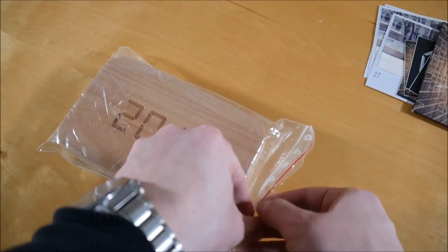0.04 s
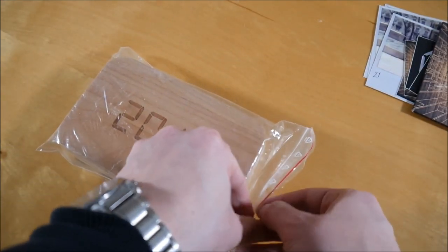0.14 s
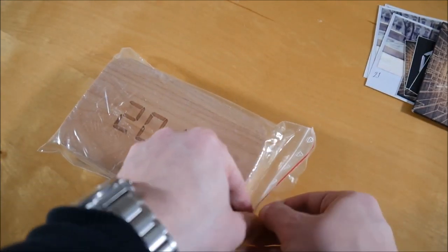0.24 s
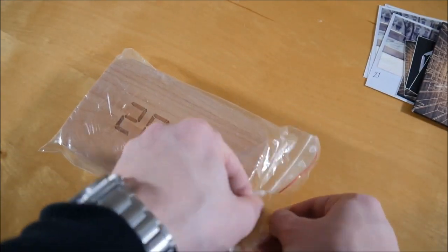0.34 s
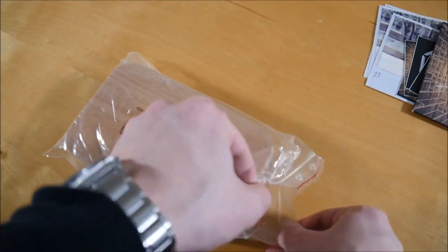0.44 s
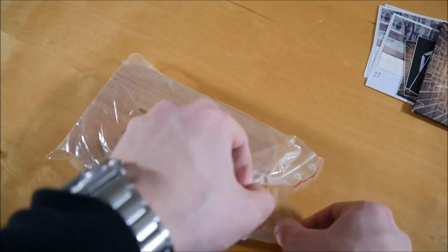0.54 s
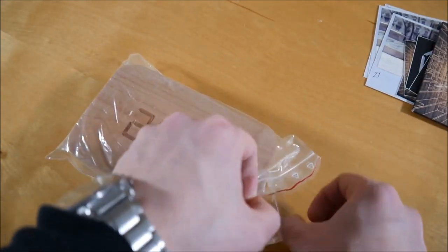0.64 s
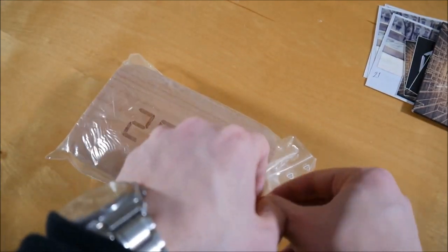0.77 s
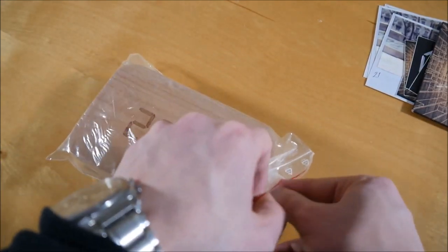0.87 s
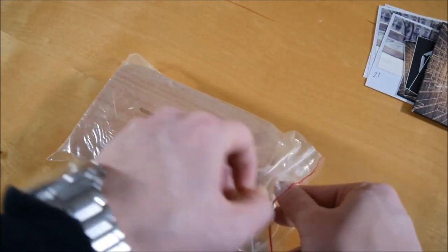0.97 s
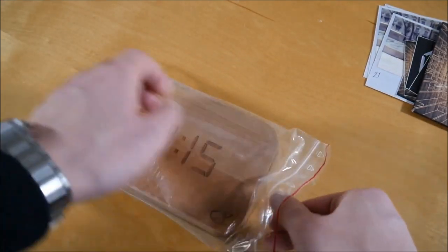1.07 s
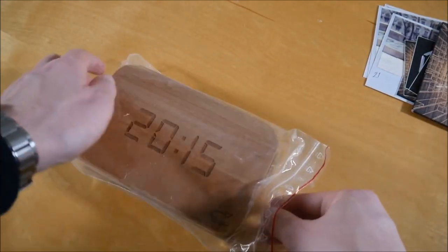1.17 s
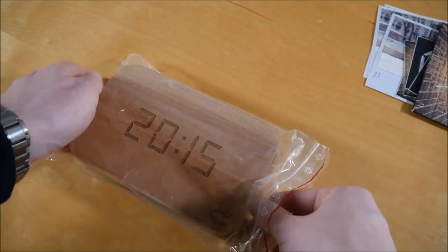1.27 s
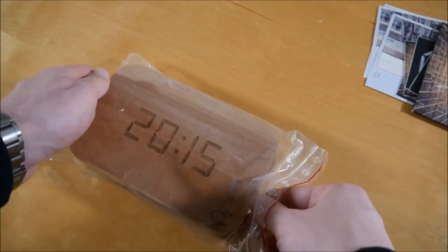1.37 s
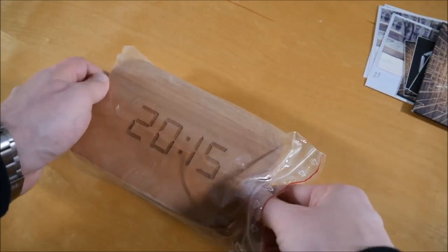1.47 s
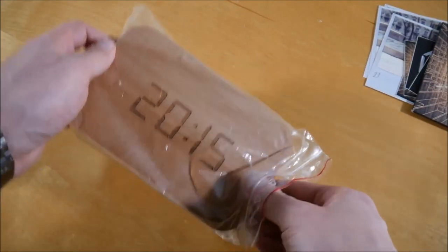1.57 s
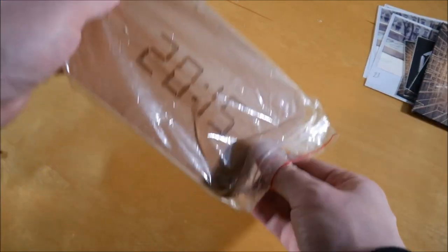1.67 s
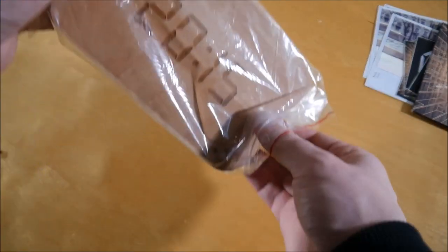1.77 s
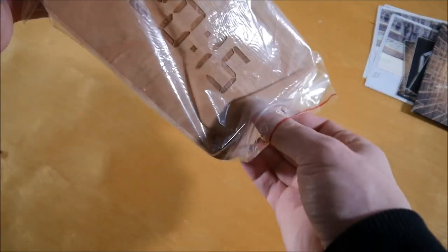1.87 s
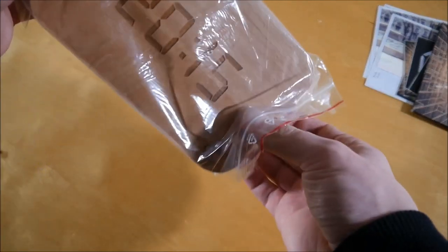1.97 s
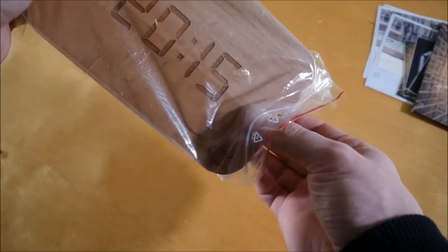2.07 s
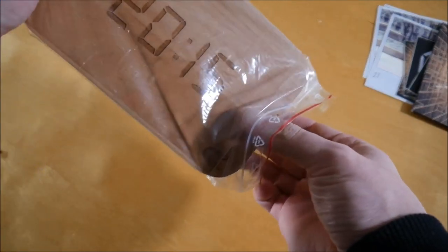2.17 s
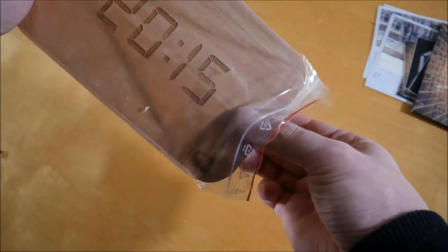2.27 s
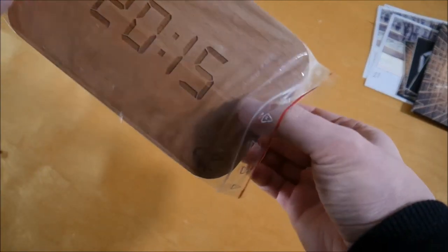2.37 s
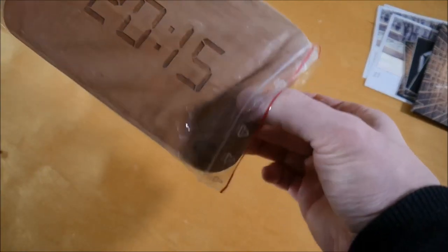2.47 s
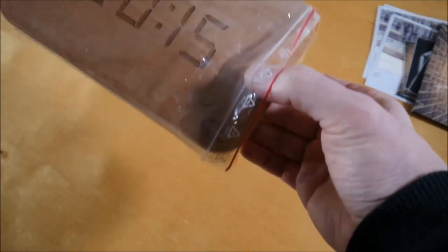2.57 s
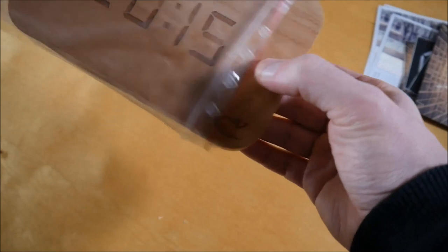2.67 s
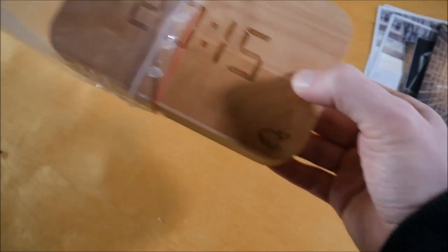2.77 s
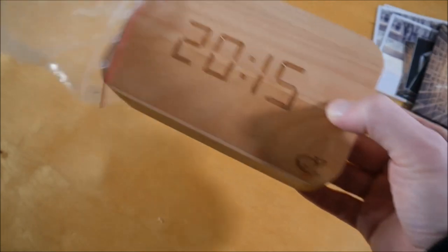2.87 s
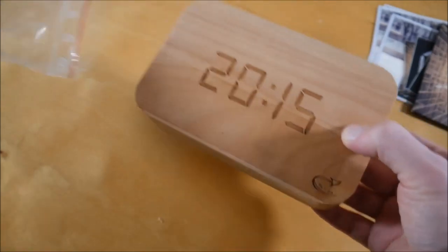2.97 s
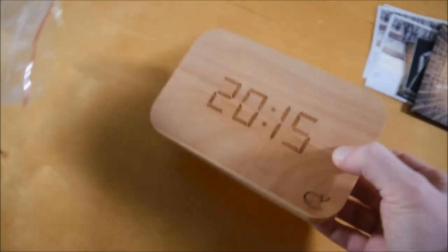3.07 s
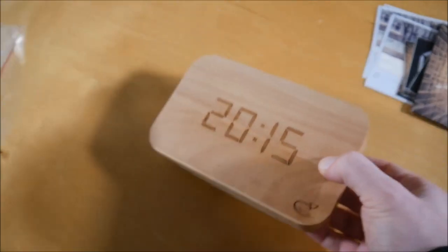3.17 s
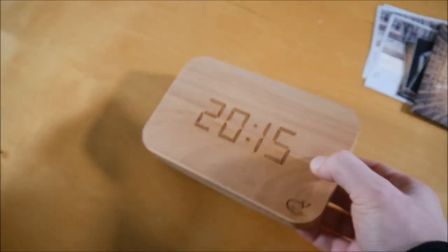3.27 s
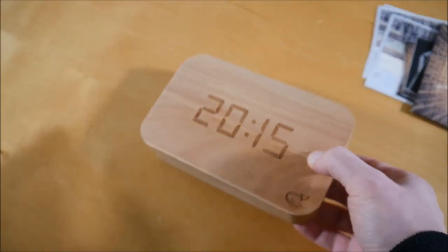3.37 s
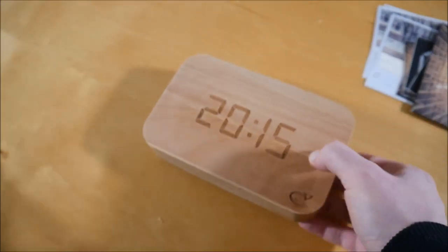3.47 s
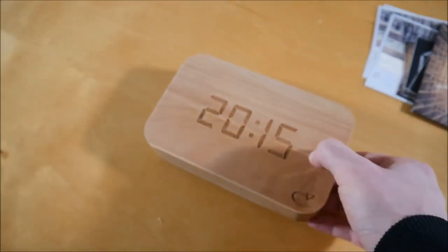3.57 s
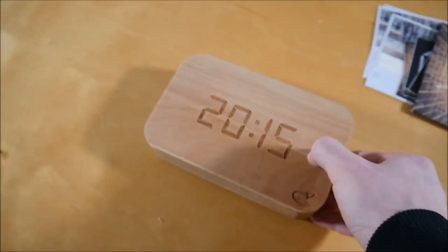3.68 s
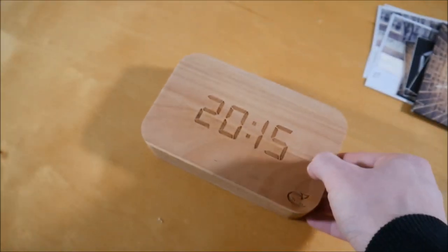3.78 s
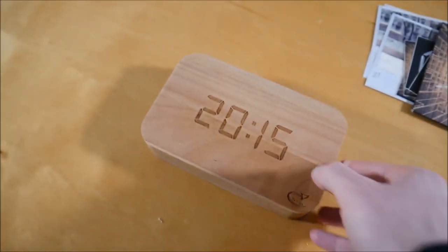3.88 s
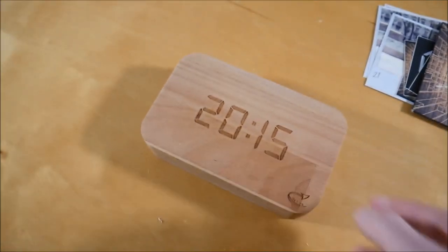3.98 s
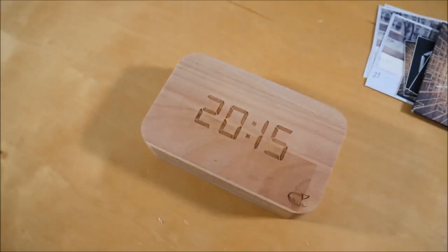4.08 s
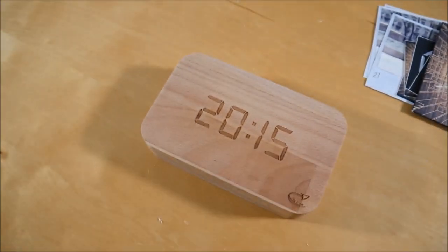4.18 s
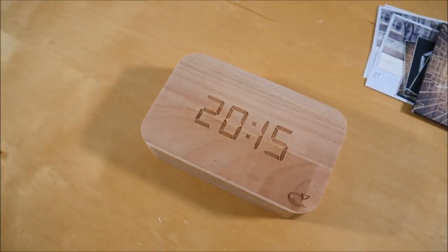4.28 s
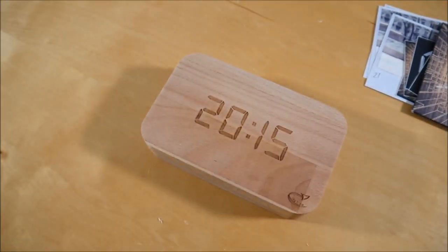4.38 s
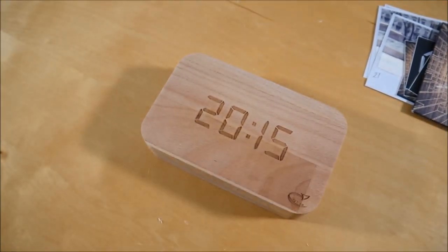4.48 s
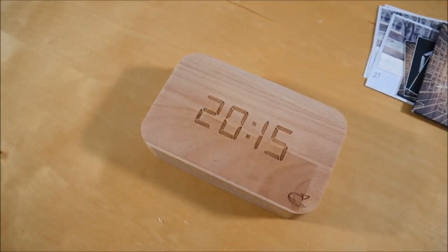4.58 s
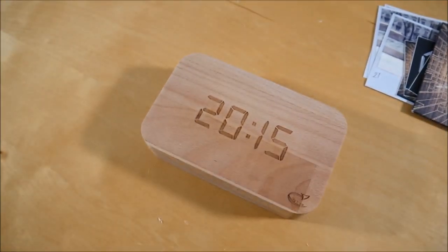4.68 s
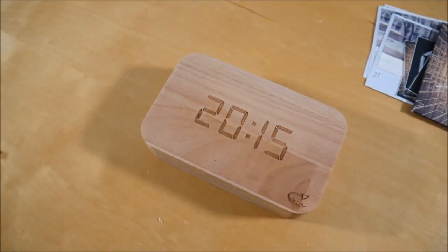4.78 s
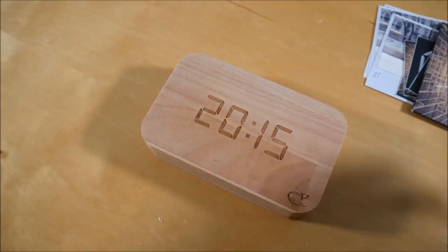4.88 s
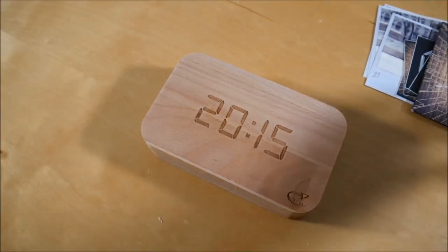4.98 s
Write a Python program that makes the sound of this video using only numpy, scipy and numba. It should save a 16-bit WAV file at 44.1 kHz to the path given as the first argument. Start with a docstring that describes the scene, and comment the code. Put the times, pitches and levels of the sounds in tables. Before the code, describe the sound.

Thin plastic bag crackles and snaps loudly as a small wooden box is worked out, then knocked down and settled on a wooden table.

```python
"""Film buckles in snaps and dense crackle, a small wooden box drums, knocks, rocks and drops flat on a wooden table.
Two hands work a zip bag open and slide the box out, in a quiet room, close under a camera with two microphones.
Film and wood are built from decaying rings and resonated bumps, with dense reflections from the room.
A faint hum and a ticking whirr, both filtered noise, sit in a steady hiss."""
import sys
import numpy as np
from scipy import signal
from scipy.fft import rfft, irfft
from scipy.io import wavfile
from numba import njit

SR = 44100
rng = np.random.default_rng(int(sys.argv[2]) if len(sys.argv) > 2 else 0)


def dump(signal):
    """Clip the signal to [-1, 1] and save it as 16-bit WAV at the path in sys.argv[1]."""
    limited = np.clip(np.atleast_2d(signal).T, -1, 1)
    pcm = np.round(limited * 32767).astype(np.int16)
    wavfile.write(sys.argv[1], SR, pcm)


N = 222264
SIDES = np.array([[1], [-1]])  # left and right microphone


def undb(db):
    """Turn decibels into an amplitude factor."""
    return 10 ** (np.asarray(db) / 20)


def level(x, db):
    """Scale a signal to an RMS level."""
    return x * undb(db) / np.sqrt(np.mean(x ** 2))


def band(x, hz, width):
    """Two-pole resonance, gain 1 at the centre."""
    return signal.lfilter(*signal.iirpeak(min(hz, .45 * SR), hz / width, fs=SR), x)


@njit
def rings(n, start, pole, rise, left, right):
    """Each grain swells quickly and decays, with its own size and phase at either microphone."""
    out = np.zeros((2, n))
    for k in range(len(start)):
        phasor, i, unrisen = 1 + 0j, start[k], 1.
        while i < n and abs(phasor) > .004:
            out[0, i] += (1 - unrisen) * (left[k] * phasor).imag
            out[1, i] += (1 - unrisen) * (right[k] * phasor).imag
            phasor, i, unrisen = phasor * pole[k], i + 1, unrisen * rise[k]
    return out


def grains(s, hz, t60, size, pan_db, lag_s, rise_cycles=.2):
    """Rings from times, pitches and decays; the path difference turns the phase between the microphones."""
    columns = np.broadcast_arrays(s, hz, t60, size + 0j, pan_db, lag_s)
    s, hz, t60, size, pan_db, lag_s = (column.ravel() for column in columns)
    hz = np.clip(hz, 30, .45 * SR)
    pole = np.exp(2j * np.pi * hz / SR - np.log(1000) / (t60 * SR))
    rise = np.exp(-hz / (rise_cycles * SR))
    turn = undb(pan_db / 2) * np.exp(1j * np.pi * hz * lag_s)
    return rings(N, (s * SR).astype(np.int64), pole, rise, size * turn, size / turn)


def spray(s, peak, pan_db, spread_s, tilt_db, parts, fade=0.082):
    """A flurry of very short cracks over all pitches, thinning out and fading after each event."""
    u = rng.random((len(s), parts, 4))
    octave = (np.arange(parts) + u[..., 1]) / parts * 3.5
    phase = np.exp(2j * np.pi * u[..., 2])
    fading = (1 - u[..., 0]) ** fade
    size = peak * undb(tilt_db * octave) * phase * fading / np.sqrt(parts)
    crack_s = s - spread_s * np.log(1 - u[..., 0])
    return grains(crack_s, 1400 * 2 ** octave, .0018, size, pan_db, 3e-5 * (u[..., 3] - .5))


# Background noise colour, before it is set to HISS_DB: pitch_hz, level_db (relative, per Hz)
HISS_COLOUR = [(24, -56), (40, -9.5), (147, -3.5), (215, 5), (269, -1), (433, -6.5), (697, -5),
               (1090, -11.5), (1950, -12.5), (2500, -15.5), (2910, -18), (9940, -21.5), (14800, -24.5),
               (16000, -26.5)]
HISS_DB = -59


def hiss():
    """Steady background noise of a fixed colour, partly different at the two microphones."""
    log_hz = np.log(np.fft.rfftfreq(N, 1 / SR) + 1)
    hz, db = np.transpose(HISS_COLOUR)
    colour = undb(np.interp(log_hz, np.log(hz), db))
    mid, side = irfft(rfft(rng.standard_normal((2, N))) * colour, N)
    return level(mid + .7 * side * SIDES, HISS_DB)


# Hum lines of the camera: pitch_hz, width_hz (of each of two filters), level_db
HUM_LINES = [(146, 8.1, -75.5), (214.5, 13, -62), (267, 12, -79)]


def hum():
    """Noise through narrow resonances gives wavering hum lines, alike at both microphones."""
    lines = 0
    for hz, width, db in HUM_LINES:
        noise = rng.standard_normal(N)
        lines = lines + level(band(band(noise, hz, width), hz, width), db)
    return lines


# Whirr bands of the camera: pitch_hz, width_hz (first filter; the second is twice as wide), level_db
WHIRR_BANDS = [(715, 160, -72.5), (882, 140, -73.5)]
WHIRR_TICKS_PER_S, WHIRR_LEAD_S = 25, 0.028


def whirr():
    """Noise that restarts sharply and dies away at a steady rate rings two resonances."""
    cycle = (np.arange(N) / SR + WHIRR_LEAD_S) * WHIRR_TICKS_PER_S % 1
    beat = np.exp(-cycle / 0.096)
    bands = 0
    for hz, width, db in WHIRR_BANDS:
        ticks = beat * rng.standard_normal(N)
        bands = bands + level(band(band(ticks, hz, width), hz, 2 * width), db)
    return bands


# Tugs of the hands at the bag: start_s, rise_s, hold_s, crackle_db (relative), fold_db (big folds, low mids over
# the crackle), taut_db (taut film, top over the crackle), box_db (drumming, relative), pan_db (left minus right)
HAND_TUGS = [(0.017, 0.015, 0.12, -58.5, 3.5, -2, -67.5, 4),
             (0.181, 0.0018, 0.0041, -41.5, -17, -35.5, -59.5, -2),
             (0.216, 0.021, 0.01, -45, -10, -15, -69, 0), (0.3, .005, 0.052, -55.5, -10.5, -3, -61, 1),
             (0.364, 0.05, 0.11, -29.5, -14.5, -7, -43, -1.5),
             (0.598, 0.0062, 0.15, -46.5, -5.5, -10, -49.5, -2),
             (0.825, 0.021, 0.0062, -42, -3, -5, -52, 1.5), (0.893, 0.2, 0.0024, -37.5, -4, -5, -46, -3),
             (1.124, 0.082, .01, -46, -4, 5, -44.5, -1), (1.32, 0.015, 0.14, -49, -13, -12, -55.5, 5),
             (1.23, 0.094, 0.055, -64, 1, -4, -56, 3), (1.41, 0.026, 0.11, -65, -9, 0, -57, 0),
             (1.478, 0.0052, 0.0058, -37.5, -18, -13, -62.5, 5),
             (1.513, 0.02, 0.19, -38, -6, -5.5, -46.5, 2), (1.749, 0.083, 0.016, -33, -8, 1, -38.5, -1.5),
             (1.919, 0.0094, 0.052, -36.5, -10.5, -3, -46, 0),
             (2.01, 0.0063, 0.096, -33, -8.5, -5.5, -36.5, -2),
             (2.192, 0.013, 0.0056, -53.5, 3, -10.5, -38.5, -1),
             (2.257, 0.025, 0.27, -35, -9, 2.5, -37, 1.5),
             (2.395, 0.097, 0.0084, -29.5, -13, -6.5, -31, -1),
             (2.6, 0.0079, 0.012, -34, -5, -23, -30.5, 5), (2.675, 0.067, 0.19, -30.5, -3.5, 2.5, -30.5, 2),
             (3.062, 0.011, 0.0036, -65, 14.5, -17.5, -67.5, 16.5),
             (3.51, .005, 0.011, -68, -20, -10, -72, -5), (3.62, 0.01, .005, -67.5, 1, 14, -63, -4.5),
             (3.706, 0.11, 0.092, -50.5, 0.5, -10, -45.5, 3), (4.037, 0.068, .01, -65, -13, -3, -60.5, 5.5),
             (4.121, 0.14, 0.0075, -52, -12, -2, -57, 4.5), (4.31, 0.024, 0.05, -52, -9, 0.5, -61, 5),
             (4.461, 0.026, 0.019, -57, -16, -4.5, -87, 6), (4.792, 0.02, 0.0031, -66, -11, -5.5, -75, 6.5),
             (4.994, 0.0062, 0.0093, -41.5, -9.5, -8.5, -61, 3.5)]
SWELL_DB, SAG_DB_PER_S, RELEASE_DB_PER_S = 15.5, 7.5, 273  # gained in the rise, lost while held, lost once let go


def tugging(s):
    """Every tug swells, sags while held and is let go; where tugs overlap the stronger one sets the colour."""
    start, rise, hold, tug_db, tug_fold_db, tug_taut_db, tug_box_db, tug_pan_db = np.transpose(HAND_TUGS)
    shapes = []
    for start_s, rise_s, hold_s in zip(start, rise, hold):
        times = np.cumsum([start_s - .006, .006, rise_s, hold_s, .5])
        sag_db = -SAG_DB_PER_S * hold_s
        shapes.append(np.interp(s, times, [-150, -SWELL_DB, 0, sag_db, sag_db - RELEASE_DB_PER_S / 2]))
    shape_db = np.array(shapes)
    power = undb(2 * (shape_db + tug_db[:, None]))  # doubled decibels turn amplitude into power
    total = power.sum(0)
    fold_db, taut_db, pan_db = (column @ power / total for column in (tug_fold_db, tug_taut_db, tug_pan_db))
    box_db = 10 * np.log10(undb(2 * tug_box_db) @ undb(2 * shape_db))
    return 10 * np.log10(total), fold_db, taut_db, box_db, pan_db


def crackle(count=40000, colour_db=1.64, scatter_db=4.0, burst_db=3, jerk_db=1.5, largest_db=15, thin_db=5,
            lag_s=2.5e-5):
    """Thousands of tiny buckles; big folds ring low, taut film rings high, and they come in short bursts."""
    u, g = rng.random((count, 4)).T, rng.standard_normal((count, 2)).T
    s, octave = u[0] * N / SR, 4.5 * u[1] ** .65 - 2.7
    crackle_db, fold_db, taut_db, _, pan_db = tugging(s)
    low, high = np.clip(-octave / 1.5, 0, 1.2), np.clip(octave / 1.6, 0, 1)
    at = s * SR
    # a burst is one patch of film, so it spans about an octave and a half
    patch = (octave / 1.5 + 2 + u[3]).astype(int)
    bursts = rng.standard_normal((N // 150 + 1, 6))[(at / 150).astype(int), patch]
    # other folds take the strain every few hundredths of a second, each with its own colour
    fold = (octave / .8 + 4 + u[3]).astype(int)
    colours = rng.standard_normal((N // 1200 + 1, 8))[(at / 1200).astype(int), fold]
    # the whole film slips in jerks of a few ms
    jerks = rng.standard_normal(N // 200 + 1)[(at / 200).astype(int)]
    size_db = burst_db * bursts + colour_db * colours + jerk_db * jerks - scatter_db * np.log(1 - u[2])
    size_db = np.minimum(size_db, largest_db)
    db = crackle_db + low * fold_db + high * (taut_db + thin_db) + size_db
    hz = 4200 * 2 ** octave
    size = undb(db) * np.exp(2j * np.pi * u[3])
    return grains(s, hz, 8 / hz, size, pan_db + 1.5 * g[1], lag_s * g[0])


SMALL_POPS_PER_S, SMALL_POP_DB = 120, 5.5  # mean level over the crackle


def small_pops(low_hz=700, octaves=2.8, scatter_db=2, crack_db=1, crack_scatter_db=3, pan_scatter_db=3):
    """Snap rows drawn by chance; their strength follows the tug of the moment."""
    count = int(SMALL_POPS_PER_S * N / SR)
    u, g = rng.random((count, 2)).T, rng.standard_normal((count, 3)).T
    s = u[0] * N / SR
    crackle_db, _, _, _, pan_db = tugging(s)
    ring_db = crackle_db + SMALL_POP_DB + scatter_db * g[0]
    hz = low_hz * 2 ** (octaves * u[1])
    return np.transpose([s, ring_db, hz, crack_db + crack_scatter_db * g[1], pan_db + pan_scatter_db * g[2]])


# Loud single buckles of the film: start_s, ring_db (relative), pitch_hz, crack_db (over the ring),
# pan_db (left minus right)
FILM_SNAPS = [(0.022, -37, 1500, -2, 0.5), (0.0343, -39, 1620, 11, -8), (0.056, -32.5, 1450, 11, -3),
              (0.0895, -26, 1430, 0, -2.5), (0.1371, -24, 1750, -6, -3.5),
              (0.1476, -19.5, 1760, -4.5, -2.5), (0.1882, -23.5, 1390, 0, 1),
              (0.2342, -18.5, 1950, -7.5, -3), (0.2513, -10.5, 1820, -19.5, 2), (0.2872, -15, 1900, 8.5, 2),
              (0.2878, -7.5, 6450, -1, 1), (0.302, -25, 1610, 13.5, 1), (0.3554, -24, 1700, -0.5, -4),
              (0.3733, 3, 1740, -1.5, -3), (0.3738, -15, 4100, -10, -1.5), (0.3902, -8.5, 1480, 13, 2),
              (0.4369, -18.5, 2800, -9, 11), (0.4475, -16, 2140, -8, -2), (0.457, -14, 2800, -6, 3),
              (0.4627, -13, 2920, -11, 3.5), (0.4915, -22.5, 1490, 13, 1), (0.5055, -24, 5060, -5, 0),
              (0.5143, -11.5, 3900, 3, -8), (0.5258, -8.5, 5200, -8, 2), (0.497, -15, 3530, 1, 5),
              (0.532, -21, 3500, 11, -1), (0.6064, -12, 3670, 0.5, 3), (0.611, -15, 2850, 2.5, -4),
              (0.6708, -26.5, 806, -1, 4), (0.6792, -22, 4300, 4, 3), (0.7222, -26, 2200, 9, 1),
              (0.767, -30, 3200, -3, 0), (0.8365, -22, 3600, -4.5, 0.5), (0.8805, -20.5, 2100, -14, -3),
              (0.9207, -25, 2300, -2, -5), (0.987, -23, 1480, 3, 5), (0.9905, -20.5, 6500, 8, -2),
              (0.996, -22, 1490, -5, 0), (1.024, -22, 3200, -3, 0), (1.041, -19.5, 1940, 1.5, 5),
              (1.083, -22, 1480, -7, 0), (1.0895, -8.5, 5500, -6.5, 1), (1.098, -11.5, 3400, -2, 0),
              (1.112, -22.5, 1480, 3, 3), (1.164, -26, 1400, 4, 4), (1.1474, -25.5, 2060, 8.5, -1),
              (1.2051, -31, 1120, 8, -1), (1.21, -21, 5500, -1, 0), (1.218, -23, 5500, 7, 2),
              (1.233, -13, 10600, -7, 0), (1.3004, -36, 2000, -5, -2), (1.314, -35, 1250, -5, 0),
              (1.338, -20.5, 2030, -1, -3), (1.3572, -21, 2630, -5, -3), (1.4006, -28, 4700, 12.5, -1.5),
              (1.4268, -21.5, 3220, 1, -0.5), (1.429, -29.5, 1300, -5, 4), (1.4701, -4.5, 7700, -5.5, -0.5),
              (1.5364, -24, 1400, 10, -8), (1.549, -15.5, 2840, 9, -3), (1.5525, -16, 3360, 12.5, -1),
              (1.5787, -20, 2680, 7, 3), (1.586, -17, 2600, 5, -4), (1.601, -18, 1040, 4.5, 3),
              (1.797, -18, 3270, 5, 5), (1.6234, -18.5, 4600, 10.5, 2), (1.6797, -19, 3450, 8, -2),
              (1.7474, -22, 3720, 6, -0.5), (1.7644, -17.5, 6300, 0, 2), (1.8309, -16.5, 1930, 11, -5),
              (1.8441, -10.5, 2880, 7, -3), (1.849, -14, 3230, 9, 7), (1.931, -20.5, 3500, 7.5, 0),
              (1.936, -4.5, 8100, -7, 3), (1.943, -19, 5500, 4, 0), (1.966, -25, 5700, 11, 7),
              (1.9739, -15.5, 3570, -8, -1), (2.0066, -24, 1820, -4, 3), (2.021, -7, 4500, 6, -2),
              (2.0254, -4.5, 1500, 9, 2), (2.041, -15, 1900, -13, -2), (2.0765, -15.5, 2750, 12, 3),
              (2.088, -20, 2600, 3, -5.5), (2.1051, -15.5, 1184, -11, 4), (2.1259, -17, 1640, 5, 1),
              (2.1675, -31.5, 1680, 16, 4), (2.175, -25, 1900, 3, 0), (2.191, -26, 1900, 1, 0),
              (2.2015, -9, 3840, 4.5, 1), (2.2216, -19, 3630, -1, 0.5), (2.28, -16, 4500, 2, 0),
              (2.264, -22, 5300, 10.5, 2), (2.2736, -23, 3640, 5, -7), (2.287, -18, 3500, -1, 3),
              (2.3042, -20, 1810, -1, -5), (2.358, -17, 1900, 7, -3.5), (2.389, -15, 3930, 9, 4),
              (2.4072, -1, 9250, -2.5, 2), (2.376, -10, 9050, 2, 0), (2.449, -9, 9500, 3, 0),
              (2.424, -12.5, 1970, 6, -4), (2.4327, -12, 1930, 3, 1), (2.5476, -28, 1400, 7, 3),
              (2.5631, -28, 1550, 19.5, 3), (2.603, -21, 3950, 12, 2), (2.6085, -21.5, 1430, 13, 0),
              (2.637, -11.5, 2160, -11, 4), (2.641, -6.5, 6100, -4, 2), (2.654, -15, 4970, -2, 0),
              (2.685, -35, 1500, -6, 0), (2.7085, -17, 1800, 4, -1), (2.7408, -17, 1320, -2, 7),
              (2.7771, -31, 1350, -8.5, 16.5), (2.969, -16.5, 3500, 1.5, -1.5),
              (2.9607, -15, 2840, 4.5, -0.5), (2.9883, -9.5, 7000, 2, 4), (3.0688, -28.5, 3060, -16, 3),
              (3.0808, -15, 3340, -7, 3.5), (3.4241, -38, 3900, -29, 9), (3.5404, -25, 5670, 11.5, 5.5),
              (3.6182, -43.5, 2530, 20, 8.5), (4.0731, -35, 5740, 2.5, 5), (4.4777, -31, 6010, 3, 4),
              (4.9067, -34.5, 7420, -11.5, 4), (4.9977, -33.5, 4760, -14, 0.5)]


def snaps(cycles=8.2, after_db=-9, mean_tilt_db=-0.45, tilt_scatter_db=0.91, echo_s=0.0041, echo_db=-10):
    """A fold pops: a few cycles at its own pitch, sharp cracks, a settling flurry and a bounce off a surface."""
    rows = np.vstack([FILM_SNAPS, small_pops()])
    s, db, hz, crack_db, pan_db = (column[:, None] for column in rows.T)
    crack = undb(db + crack_db)
    # some folds crack dull, some bright: decibels per octave
    tilt_db = mean_tilt_db + tilt_scatter_db * rng.standard_normal(s.shape)
    pop = grains(s, hz, cycles / hz, undb(db), pan_db, 0)
    pop = pop + spray(s, crack, pan_db, .001, tilt_db, parts=30)
    settle = spray(s, crack * undb(after_db), pan_db, .007, tilt_db, parts=90)
    bounce = undb(echo_db) * np.roll(band(pop, 8300, 8600), int(echo_s * SR), axis=1)
    return pop + settle + bounce


MODE_PAN_DB, MODE_LAG_S = 3.5, 6e-5  # scale of each mode's random lean and lag between the microphones
ONE_SIDED_HZ = 680  # modes under this radiate ever more evenly


def sidedness_db(hz):
    """How far a mode may lean to one microphone; long waves reach both alike."""
    return MODE_PAN_DB * np.minimum(hz / ONE_SIDED_HZ, 1)


# Modes of the wooden box and table top, drummed here and struck in knocks():
# pitch_hz, level_db (relative), t60_s (undamped)
WOOD_MODES = [(91, -12, 0.15), (152.6, -16, 0.24), (203.4, -14.5, 0.23), (248, -13, 0.088),
              (288.8, -5.5, 0.099), (341.6, -3, 0.085), (386, -9, 0.084), (413, -9, 0.051),
              (459.6, -6.5, 0.065), (520, -2, 0.051), (591, -3.5, 0.051), (640.3, -5.5, 0.04),
              (700, -7, 0.083), (778.5, -8, 0.08), (883, -12, 0.074), (1022, -9.5, 0.02),
              (1285, -4.5, 0.012), (1451, -10, 0.042), (2160, -4, 0.014)]
TABLE_HZ, DEEP_HZ = 230, 400  # table modes lie under the first, deep box modes between the two
LIFTED_S, LANDED_S = 1.65, 3.24
TABLE_LIFTED_DB, TABLE_RESTING_DB = -23, -3  # gain; the table is nearly still while the box is lifted
DEEP_LIFTED_DB, DEEP_RESTING_DB = -6.5, -1.5  # gain of the deep box modes
ROCKING_START_S, ROCKING_END_S = 3.47, 3.785  # the box wobbles on one edge
ROCKING_DB, ROCKING_DB_PER_S = -38.5, 39  # level at the start, then the loss
ROCKING_HIGH_DB = -18  # all the other modes, over the wobble
ROCKING_HZ, ROCKING_WIDTH_HZ = 282, 15  # held by one edge, the box rings mostly in one low mode


def drumming(rate=550, damping=0.33):
    """Fingers and film rub box and table with many small bumps (rate per second) that ring their modes."""
    bumps = (rng.random(N) < rate / SR) * rng.standard_normal(N)
    hz = np.transpose(WOOD_MODES)[0]
    modes = []
    for mode_hz, db, t60 in WOOD_MODES:
        ring = band(bumps, mode_hz, 2.2 / (damping * t60))  # a shorter decay is a wider resonance
        modes.append(level(band(ring, mode_hz, 0.53 * mode_hz), db))
    lean_db = sidedness_db(hz)[:, None, None] * rng.standard_normal((len(hz), 1, 1)) * SIDES
    modes = np.array(modes)[:, None] * undb(lean_db)
    deep = level(modes[(hz >= TABLE_HZ) & (hz < DEEP_HZ)].sum(0), 0)
    high = level(modes[hz >= DEEP_HZ].sum(0), 0)
    table = level(modes[hz < TABLE_HZ].sum(0), 0)
    wobble = level(band(band(bumps, ROCKING_HZ, ROCKING_WIDTH_HZ), ROCKING_HZ, ROCKING_HZ / 2), 0)

    t = np.arange(N) / SR
    steps = t[::64]
    grip = undb(np.interp(t, steps, tugging(steps)[3]))
    lifted = (t > LIFTED_S) & (t < LANDED_S)
    table_gain = undb(np.where(lifted, TABLE_LIFTED_DB, TABLE_RESTING_DB))
    deep_gain = undb(np.where(lifted, DEEP_LIFTED_DB, DEEP_RESTING_DB))
    gripped = grip * (high + deep_gain * deep + table_gain * table)
    rocking = undb(ROCKING_DB - ROCKING_DB_PER_S * (t - ROCKING_START_S))
    rocking = rocking * (t > ROCKING_START_S) * (t < ROCKING_END_S)
    return gripped + rocking * (wobble + undb(ROCKING_HIGH_DB) * (high + deep + table))


def softness(hz, contact_ms):
    """A push passes little above the pitch whose period is the contact time."""
    return 1 / (1 + (hz * contact_ms / 1000) ** 3)


# Box against table or fingers: start_s, blow_db (relative), contact_ms, then relative to the blow: click_db (edge),
# tick_db (bright), table_db (table top), deep_db (deep box modes), thud_db (air); spot_hz (favoured pitch)
BOX_KNOCKS = [(1.185,-35,0.96,-26,-30,-5,-9,-12,710),(1.281,-45,2,-22,-25,-10,6,-12,370),(1.348,-34.5,1,-12,-22,6,8,-14,520),(1.356,-27,1.8,-20,-25,9,1,-12,331),(1.372,-32.5,2,-20,-25,7,2,-12,292),
              (1.428,-31.5,3,-19,-20,8,3,-12,149),(1.451,-43,2.6,-20,-25,2,5,-10,203),(1.523,-36.5,2.7,-16,-22,-4,6.5,-12,354),(1.601,-41,2.5,-20,-25,-16,6,-10,340),
              (2.489,-28,0.79,-14,-15,-14,1,-10,384),(2.499,-22,0.68,-12,-12,2,4,-10,384),(2.511,-20,1.3,-3,-24,-15,1,-3,640),(2.545,-30,1.5,-15,-24,-17,5,-14,385),
              (2.6092,-15,1,-10,-17,-25,-2,-16,525),(2.621,-23.5,0.97,-16,-22,-9,-6,-7,523),
              (2.64,-14,1.6,-9,-22,-29,1,-8,369),(2.71,-18.5,1.1,-18,-14,-14,1.5,-18,290),(2.735,-21,.8,-12,-15,-23,-8,-6,636),(2.742,-16,0.56,-17,-15,-24.5,-12,-15.5,650),(2.752,-22.5,0.89,-12,-18,7.5,-6,-10.5,222),(2.866,-19.5,.6,-14,-20,-22,-4,-10,630),
              (2.885,-23,.7,-13,-20,-22,-8,-8,640),(2.911,-26,1,-14,-19.5,-25,-6,-10,450),
              (3.2427,-8,0.34,9,16.5,-10,0,-8,329),(3.253,-9,1.1,-23,-17,3,-5,-16.5,526),(3.263,-18.5,1,-21.5,-14.5,-4,-9,-10,580),(3.274,-19,0.82,-8.5,-16.5,-7.5,0,-7,290),(3.2848,-11.5,0.51,6.5,6.5,-5,-8,-6,340),(3.299,-13,1.1,-20,-2,0.5,2.5,-10,320),
              (3.31,-16.5,.9,-9,-11,1,-8,-8,570),(3.332,-19.5,0.78,-20,-20,5,-1.5,-15,190),
              (3.449,-12.5,0.48,-0.5,-5.5,0,0,-2,341),(3.457,-20,1,-4,-12,-18,3,-20,317),(3.4661,-18.5,1.1,5,-1,-8,-10,-14,500),(3.472,-19.5,0.62,-2.5,-14,-16,-3,-14,332),
              (3.497,-21.5,2,-17,-29,-15,4,-16,287),(3.519,-19,2.2,-16,-15,-2,5,-20,336),(3.553,-22.5,3.3,-28,-32,-10,5.5,-15,290),
              (3.584,-23,1.5,-10,-29,-12,3,-23,294),(3.602,-30,2,-18,-20,-14,1,-15,282),(3.633,-28.5,1.4,-9,-28,-4,5,-16,327),(3.649,-40,1.6,-15,-30,-12,-2,-14,280),
              (3.669,-25,2.3,-15,-30,-7,-2,-14,281),(3.682,-39,1.3,-12,-30,-5,-11,-10,280),(3.796,-20,1.7,-32,-20,-17,1,-22,340),
              (3.821,-15,0.49,6.5,3,-26,2.5,-9,343),(3.8273,-7.5,0.14,4,10,7,2,-12,330),(3.832,-10.5,0.28,3,5,0,-5,-12,645),(3.842,-9.5,0.27,-13,0.5,-19,-5,-4,532),(3.854,-12.5,0.61,-8,-10,-15,3,5.5,650),(3.864,-15,0.81,-15,-3,-1,-5,-3,467),
              (3.885,-18,0.4,1.5,2.5,-5,-5,-6,1440),(3.905,-23,0.89,-6,-7,2,-19,-10,206),
              (4.624,-50,.62,6,-17,2,-4.5,-12.5,220),(4.997,-37.5,0.96,-3,-16,-24,-14,-10,510)]
SPOT_DB, SPOT_WIDTH = 8.5, 0.09  # the struck spot favours modes near one pitch; width in log pitch


def knocks(ring_db=-8, spread_db=2.0, detune=0.012, pull=0.79, click_hz=1350, click_t60=0.0069, thud_hz=480,
           crack_db=11, rattle_db=7.5, phase_scatter=0.65, swell=0.4):
    """Every blow rings the same wood; a longer, softer contact leaves the high modes quiet."""
    columns = (column[:, None] for column in np.transpose(BOX_KNOCKS))
    s, db, contact_ms, click_db, tick_db, table_db, deep_db, thud_db, spot_hz = columns
    hz, mode_db, t60 = np.transpose(WOOD_MODES)
    g = rng.standard_normal((len(s), len(hz), 5))
    near = np.exp(-(np.log(hz / spot_hz) / SPOT_WIDTH) ** 2)
    held_hz = hz * (spot_hz / hz) ** (pull * near)  # grip and contact bend the modes a little
    part_db = np.where(hz < TABLE_HZ, table_db, deep_db * (hz < DEEP_HZ))
    size_db = db + mode_db + SPOT_DB * near + ring_db + spread_db * g[..., 0] + part_db
    size = undb(size_db) * np.exp(1j * phase_scatter * g[..., 2]) * softness(hz, contact_ms)
    body = grains(s, held_hz * (1 + detune * g[..., 1]), t60, size,
                  sidedness_db(hz) * g[..., 3], MODE_LAG_S * g[..., 4], rise_cycles=swell)
    # air squeezed out under the box thuds
    thud = grains(s, thud_hz, 0.0083, undb(db + thud_db) * softness(thud_hz, contact_ms), 0, 0)
    # the landing edge clicks and ticks, and the lid chatters after it
    click = grains(s, click_hz * (1 + .04 * g[:, :1, 1]), click_t60, -undb(db + click_db), 0, 0)
    tick = spray(s, undb(db + tick_db + crack_db), 0, 0.0012, -10.0, parts=40)
    chatter = spray(s, undb(db + tick_db + rattle_db), 0, 0.025, -14.5, parts=350, fade=0.87)
    return body + thud + click + tick + chatter


# Reflections of the room by band: pitch_hz, t60_s, level_db (whole tail, over the direct sound)
ROOM_BANDS = [(159, 0.5, -24.5), (334, 0.26, -24.5), (795, 0.43, -23.5), (2070, 0.42, -18.5),
              (4000, 0.47, -15), (7650, 0.26, -8)]


def room(x, gap_s=0.003, apart_hz=14000):
    """Dense reflections: noise that dies away band by band; the bass is alike at the two microphones."""
    t = np.arange(SR // 2) / SR
    onset = np.clip(t / gap_s - 1, 0, 1)
    tail = 0
    for hz, t60, db in ROOM_BANDS:
        noise = band(band(rng.standard_normal((2, len(t))), hz, hz), hz, hz)
        mid, side = noise * undb(-60 * t / t60) * onset
        both = mid + min((hz / apart_hz) ** .5, 1) * side * SIDES
        tail = tail + undb(db) * both / np.sqrt(np.sum(both ** 2))
    return signal.fftconvolve(x[None], tail, axes=1)[:, :N]


def scene():
    """Bag and box close to the microphones, their reflections, and the camera's hum and whirr."""
    # the bag's crackle and snaps carry no bass
    film_highpass = signal.butter(3, 520, "high", fs=SR, output="sos")
    bag = signal.sosfilt(film_highpass, crackle() + snaps())
    near = bag + drumming() + knocks()
    return near + room(near.mean(0)) + hum() + whirr()


TOP_HZ = 15800


def record(dry):
    """The microphones drop the bass, have a narrow dip near 8 kHz and a falling top; peaks clip."""
    x = signal.sosfilt(signal.butter(4, 115, "high", fs=SR, output="sos"), dry) + hiss()
    x = x - .75 * band(x, 7850, 300)
    x = signal.sosfilt(signal.butter(3, 12600, fs=SR, output="sos"), x)
    clipped = np.clip(x, -1, 1)
    return signal.sosfilt(signal.ellip(10, .2, 80, TOP_HZ, fs=SR, output="sos"), clipped)


dry = scene()
out = record(dry)
dump(out)
```